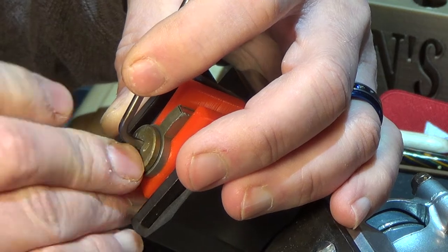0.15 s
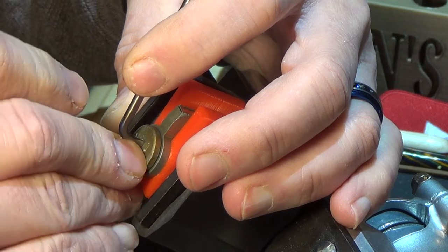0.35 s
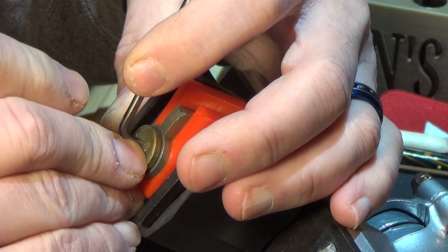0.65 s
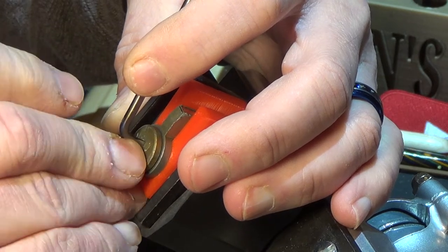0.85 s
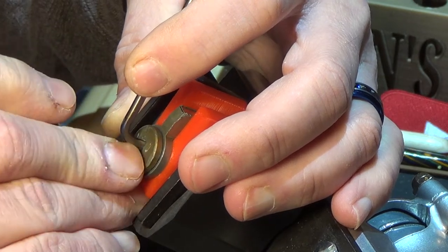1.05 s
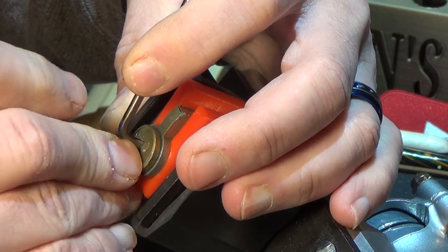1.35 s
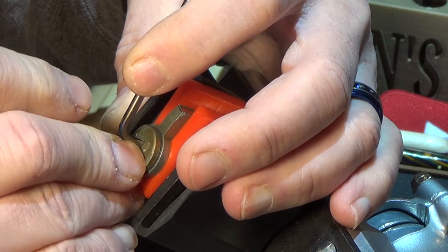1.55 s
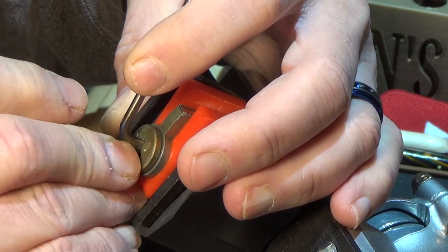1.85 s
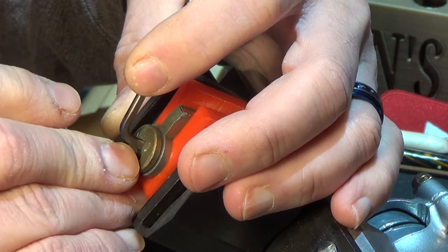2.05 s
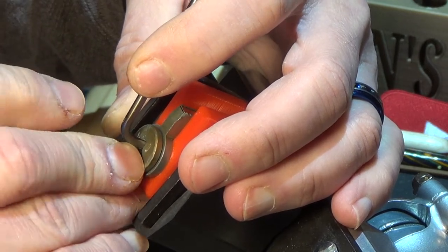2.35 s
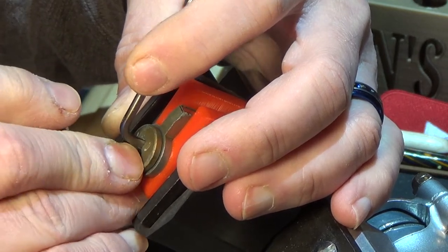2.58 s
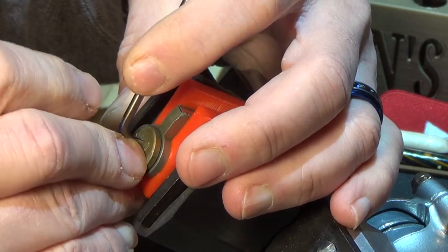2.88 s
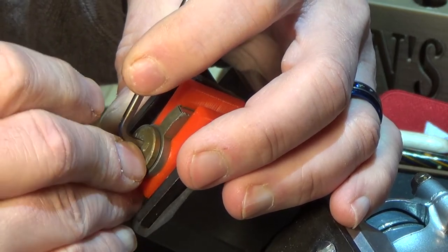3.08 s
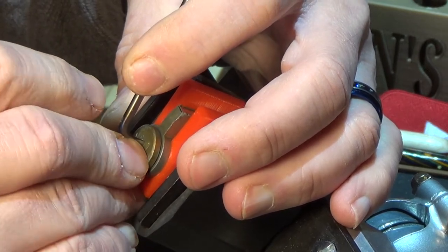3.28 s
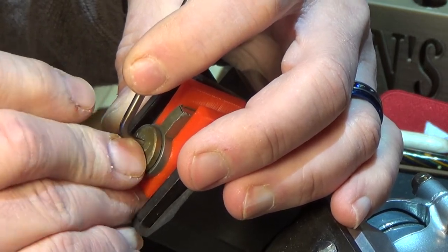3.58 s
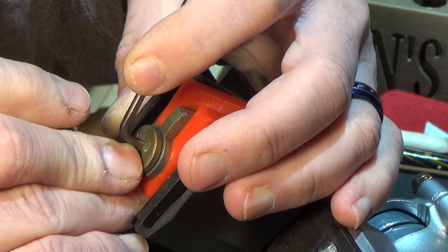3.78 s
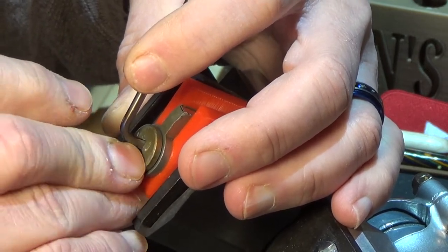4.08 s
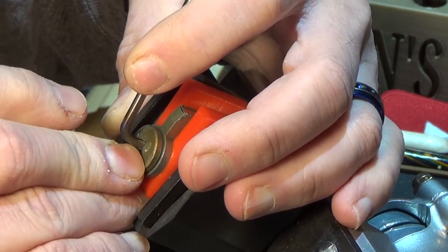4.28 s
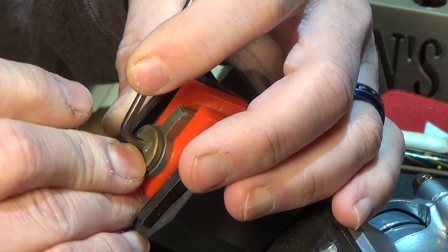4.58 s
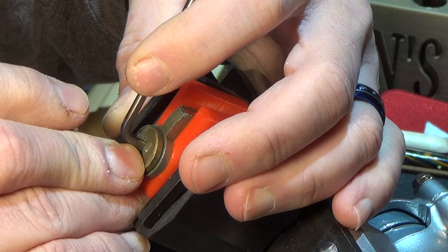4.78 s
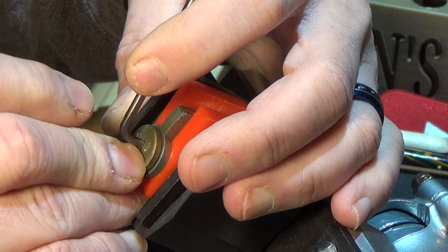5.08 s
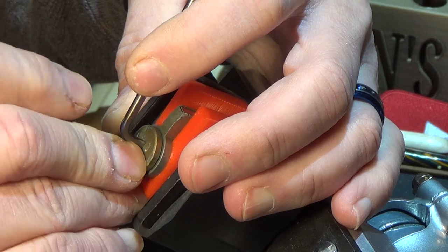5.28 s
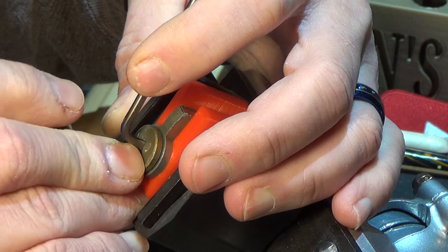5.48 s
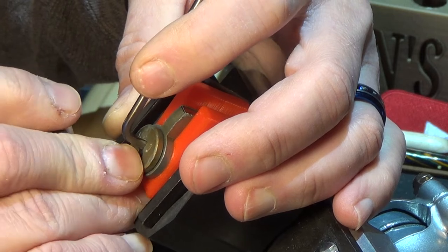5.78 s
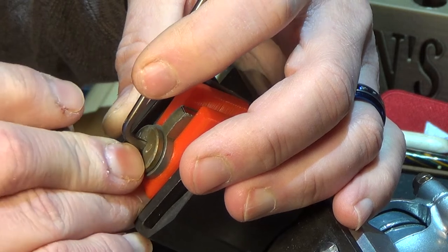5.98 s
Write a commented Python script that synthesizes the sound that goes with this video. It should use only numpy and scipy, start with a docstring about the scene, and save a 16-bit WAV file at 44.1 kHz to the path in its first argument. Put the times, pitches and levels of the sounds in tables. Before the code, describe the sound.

A steel pick clicks irregularly at lock pins close up, one click much louder, later a metallic twang, above soft fan rumble and hiss.

```python
"""Small workshop: a fan rumbles and hums, mostly to the right, over air hiss and a faint tube whine.
From 0.07 s a steel pick works the pins of a hand-held padlock: each contact ticks, clacks the pin chamber,
rings the lock body and knocks the plastic shell; loud ticks also ring the pin. Gritty scrapes join from 0.6 s.
The tool pings at 1.1 s, and slips and twangs at 4.5 s. Noise is spectrally shaped, rings are summed
decaying modes, and every pick sound gets bench echoes and a short room tail."""
import sys
import numpy as np
from scipy import signal
from scipy.fft import rfft, irfft, next_fast_len
from scipy.io import wavfile
from scipy.ndimage import map_coordinates

SR = 44100
rng = np.random.default_rng(int(sys.argv[2]) if len(sys.argv) > 2 else 0)


def wrap_up_sound(samples):
    """Save the sound to the file named by the first command line argument, as 16-bit audio."""
    columns = np.atleast_2d(samples).T
    # keep every value between -1 and 1, then stretch to whole-number steps
    tamed = np.clip(columns, -1, 1)
    steps = np.round(tamed * 32767).astype(np.int16)
    wavfile.write(sys.argv[1], SR, steps)


N = 270641
T = np.arange(SR // 4) / SR  # time since a blow, s


def amp(db):
    """Decibels to gain."""
    return 10 ** (np.asarray(db) / 20)


def unit(x):
    """Scale to rms 1."""
    return x / np.sqrt(np.mean(x ** 2) + 1e-20)


def packet(x):
    """Scale to energy 1."""
    return x / (np.linalg.norm(x) + 1e-12)


def along(points, hz):
    """Interpolate (f/Hz, value) points on a log frequency axis."""
    f, v = np.transpose(points)
    return np.interp(np.log(hz + 1), np.log(f + 1), v)


def fade(t, t60):
    """Exponential decay, 60 dB in t60."""
    return np.exp(-np.log(1000) * t / t60)


def wobble(rate_hz):
    """Smooth random curve, rate_hz knots a second."""
    knots = rng.standard_normal(int(N * rate_hz / SR) + 4)
    return map_coordinates(knots, [np.arange(N) * rate_hz / SR])


def filtered(x, response):
    """Multiply the spectrum of x by a response of frequency."""
    size = next_fast_len(N + SR // 2)
    hz = np.fft.rfftfreq(size, 1 / SR)
    return irfft(rfft(x, size) * response(hz), size)[..., :N]


# Stereo correlation of the background: f/Hz, left-right correlation
BACKGROUND_CORRELATION = [(30, .4), (70, .92), (150, .96), (400, .88), (1500, .94), (3200, .97), (5500, .5),
                          (14000, .55)]
# Stereo balance of the background: f/Hz, left minus right level/dB
BACKGROUND_BALANCE = [(60, -10), (120, -16), (240, -3.5), (480, -3), (950, 0.5), (1890, 0.0), (3770, 0),
                      (7520, 0), (15000, 0)]


def background(spectrum):
    """Stereo noise, rms 1: mid/side shares set the correlation; the bass leans right."""
    def mid_side_gain(hz):
        angle = np.arccos(np.clip(along(BACKGROUND_CORRELATION, hz), -1, 1)) / 2
        return amp(along(spectrum, hz)) * np.array([np.cos(angle), np.sin(angle)])

    def balance_gain(hz):
        return amp(along(BACKGROUND_BALANCE, hz) * np.array([[.5], [-.5]]))

    mid, side = filtered(rng.standard_normal((2, N)), mid_side_gain)
    return unit(filtered(np.array([mid + side, mid - side]), balance_gain))


def tones(lines, drift_rad, waver_db):
    """Steady sines that wander a little in phase and level."""
    t = np.arange(N) / SR
    total = np.zeros((2, N))
    for hz, db, pan_db in lines:
        level_db = db + pan_db * np.array([[.5], [-.5]]) + waver_db * wobble(4.85)
        phase = 2 * np.pi * hz * t + drift_rad * wobble(4.05)
        total += np.sqrt(2) * amp(level_db) * np.sin(phase)
    return total


# Fan noise colour: f/Hz, relative level/dB
FAN_RUMBLE = [(20, -28), (40, -20.5), (55, -23), (80, -9), (100, -5), (120, -7.5), (138, -1.5), (155, -5.5),
              (175, -3.5), (205, -9.5), (270, -11), (340, -19), (500, -40), (900, -82)]
# Fan hum lines: f/Hz, level/dB rms, left minus right level/dB
FAN_HUM = [(119, -65.5, -11), (140.4, -66.5, -8), (278.3, -76, -10), (309, -75.5, 3), (543, -75, 3),
           (1050, -83, -12)]


def fan():
    """Low noise plus wavering hum lines."""
    return amp(-53.5) * background(FAN_RUMBLE) + tones(FAN_HUM, drift_rad=0.62, waver_db=2.0)


# Hiss colour: f/Hz, relative level/dB
AIR_COLOUR = [(210, -12), (350, -2), (450, -1.5), (561, -2), (656, -7), (733, -5), (1140, -8.5), (1350, -7),
              (1560, -10.5), (2500, -12.5), (3260, -12), (9210, -17), (14100, -19), (15000, -41)]


def hiss():
    """Broadband noise with a slight level wander."""
    return amp(-60.0 + 0.13 * wobble(2.34)) * background(AIR_COLOUR)


# Picture tube lines, the two strongest beating: f/Hz, level/dB rms, left minus right level/dB
TUBE_LINES = [(15734.3, -60, 0), (15747.6, -66.5, 0), (15674.4, -75, 0), (15614.5, -80, 0), (15777, -80, 0)]
# Narrow fizz around and just below the whine: f/Hz, relative level/dB
TUBE_FIZZ = [(11000, -60), (13500, -30), (14400, -15), (15050, -9), (15350, 0), (15780, 1), (15900, -40),
             (17000, -80)]


def tube():
    """Close high lines over a narrow noise band."""
    return tones(TUBE_LINES, drift_rad=0.066, waver_db=-1.0) + amp(-72) * background(TUBE_FIZZ)


def coloured(push, colour, centre_hz=None, focus_db=0):
    """Push through a minimum-phase colour, favouring a narrow band at centre_hz; energy 1."""
    half = len(T)
    hz = np.fft.rfftfreq(2 * half, 1 / SR)
    db = along(colour, hz)
    if centre_hz:
        db = db + focus_db * np.exp(-(4 * np.log2((hz + 1) / centre_hz)) ** 2)
    # fold the cepstrum to make the response causal
    cepstrum = irfft(np.log(amp(db)))
    cepstrum[1:half] *= 2
    cepstrum[half + 1:] = 0
    response = np.exp(rfft(cepstrum))
    return packet(irfft(response * rfft(push, 2 * half))[:half])


def favoured(modes, centre_hz, focus_db, octaves):
    """The place touched decides which modes speak most: boost those near centre_hz."""
    return [(hz, db + focus_db * np.exp(-(np.log2(hz / centre_hz) / octaves) ** 2), t60)
            for hz, db, t60 in modes]


def ring(modes, attack_s, scatter_db):
    """Modes swell over the attack, then die; strengths vary per blow; energy 1."""
    hz, db, t60 = np.transpose(modes)[:, :, None]
    phase = 2 * np.pi * rng.random(hz.shape)
    strength = amp(db + scatter_db * rng.standard_normal(hz.shape))
    swell = np.sqrt(np.minimum(T / attack_s, 1))
    envelope = swell * fade(np.maximum(T - attack_s, 0), t60)
    return packet(np.sum(strength * envelope * np.sin(2 * np.pi * hz * T + phase), axis=0))


def chatter(length_s):
    """Metal catching on metal: a snap, then tiny impacts; short contacts are mostly snap."""
    envelope = (1 - np.exp(-T / 0.00004)) * np.exp(-(T / max(length_s, 1e-4)) ** 1.17)
    burst = packet(rng.standard_normal(len(T)) * envelope)
    snap = signal.unit_impulse(len(T), round(.00025 * SR))
    snap_share = np.exp(-length_s / .0011)
    push = np.sqrt(snap_share) * snap + np.sqrt(1 - snap_share) * burst
    # alternate between a flat spectrum and a short window
    for _ in range(3):
        even = irfft(np.exp(1j * np.angle(rfft(push))), len(T))
        push = even * np.exp(-(T / (2 * max(length_s, 3e-4))) ** 4)
    return push


# Noise colours of tick, clack and shell knock: f/Hz, relative level/dB
TICK_COLOUR = [(3000, -54), (5500, -1), (6800, 1), (9000, 0), (12700, -0.5), (14000, 2.5), (15500, -8),
               (17000, -22)]
CLACK_COLOUR = [(1000, -16.5), (2200, -8.5), (2900, -9), (3700, -5), (4800, -2.5), (5700, -16.5),
                (7500, -13), (14000, -20)]
KNOCK_COLOUR = [(120, -2), (300, 8), (450, 2.5), (700, 3.5), (1000, -8), (1400, 1.5), (2500, -10)]
# Modes of pin, pin chambers, lock body and plastic shell: f/Hz, relative level/dB, t60/s
PIN_MODES = [(4950, -17, .004), (6950, -22, .004), (7750, -11.5, .007), (8500, -7, .005),
             (10620, -13, .008), (11250, 0, .005), (11750, -16, .005), (13160, -8.5, .007),
             (14450, -19, .007), (15200, -14, .005)]
CHAMBER_MODES = [(2450, -4, .01), (2950, -1, .016), (3500, -6, .008), (4050, -6, .008), (4600, -1, .009),
                 (5030, 1.5, .01), (5650, -5, .006)]
LOCK_MODES = [(1209, -14, .05), (1522, -16, .04), (1597, -16, .04), (1760, -2, .014), (1827, 0, .052),
              (1925, -11, .03), (2068, -9, .04), (2200, -4, .014), (2282, -10, .045), (2350, -10, .04),
              (2570, -14, .035), (2791, -12, .045), (3360, -15, .05), (4090, -16, .06)]
SHELL_MODES = [(320, -7, .059), (451, 0, .073), (545, -3.5, .07), (677, -1.5, .045), (820, -1.5, .03),
               (1013, 0, .02), (1226, -7, .034), (1450, -3, .025)]


def contact(length_s, tick_hz, tick_db, clack_hz, clack_db, body_db, shell_hz, shell_db):
    """The pick touches a pin: tick, chamber clack, one faint early echo of both, lock and shell."""
    # loud ticks put more of their energy into the pin
    pin_share = np.clip(.06 + .8 * amp(tick_db - 3) ** 2, 0, .88)
    tick = coloured(chatter(2.3 * length_s), TICK_COLOUR, tick_hz, focus_db=10)
    tick = amp(tick_db) * np.sqrt(1 - pin_share) * tick
    pin = amp(tick_db) * np.sqrt(pin_share) * ring(PIN_MODES, attack_s=.9 * length_s, scatter_db=.7)

    chamber_share = .25
    crack = coloured(chatter(1.95 * length_s), CLACK_COLOUR, clack_hz, focus_db=6.5)
    chamber_modes = favoured(CHAMBER_MODES, clack_hz, focus_db=7, octaves=.3)
    chamber = ring(chamber_modes, attack_s=.4 * length_s, scatter_db=1)
    clack = amp(clack_db) * (np.sqrt(1 - chamber_share) * crack + np.sqrt(chamber_share) * chamber)

    # one faint early echo of tick and clack
    echo_s, echo_db = .0118, -22
    echo = amp(echo_db) * np.pad(tick + clack, (round(echo_s * SR), 0))[:len(T)]

    lock = amp(body_db) * ring(LOCK_MODES, attack_s=.0033, scatter_db=1)

    # the plastic takes a few ms to answer
    shell_modes = favoured(SHELL_MODES, shell_hz, focus_db=11, octaves=.55)
    hollow = ring(shell_modes, attack_s=.0048, scatter_db=1.5)
    thud = coloured(chatter(0.015), KNOCK_COLOUR, shell_hz, focus_db=6.5)
    shell = amp(shell_db) * (hollow + .7 * thud)
    return tick + pin + clack + echo + lock + shell


# Scrape colour: f/Hz, relative level/dB
GRIT_COLOUR = [(500, -22), (1800, -6), (3500, -5), (5200, -2), (7000, -2), (11000, 0), (13500, -3),
               (15500, -14), (17000, -30)]


def scrape(length_s, db):
    """Steel slides on brass: uneven gritty grains swell and fade."""
    stroke = np.sin(np.pi * np.minimum(T / length_s, 1))
    grains = rng.standard_normal(len(T)) * amp(6 * rng.standard_normal(len(T)))
    return amp(db) * coloured(stroke * grains, GRIT_COLOUR)


# Tool ping modes: f/Hz, relative level/dB, t60/s
PING_MODES = [(5335, 3, 0.059), (7348, -3, .04), (4027, -16, .04)]
# Rasp colour, shared by ping and twang: f/Hz, relative level/dB
RASP_COLOUR = [(1000, -25), (1900, -3), (2600, 0), (5700, 0), (7400, -1), (8200, -9), (12500, -12),
               (14500, -30)]


def ping(db):
    """The tool pings briefly over a short rasp."""
    tone = ring(PING_MODES, attack_s=.001, scatter_db=1)
    rasp = coloured(chatter(.006), RASP_COLOUR)
    return amp(db) * (tone + amp(-8) * rasp)


# Bending modes of the tool's blade: f/Hz, relative level/dB, t60/s
BLADE_MODES = [(1782, 2, .06), (2424, 1.5, .09), (2566, -8, .1), (2817, -3, .08), (3133, -7, .09),
               (3208, -9, .09), (3506, -4.5, .12), (3698, -2.5, .1), (3925, -8, .08), (4050, -5, .07),
               (4085, -3.5, .1), (4665, -3.5, .1), (4990, -5, .06), (5148, -6, .09), (5373, -1, .13),
               (5540, -6, .07), (5645, -8, .09), (6060, -3.5, .12), (6926, -4, .045), (7120, 1.5, .03),
               (7297, 5.5, .045), (7500, -9, .04)]


def twang(db, slip_s):
    """The blade rasps as it slips while its bending modes swell, then rings out."""
    blade = ring(BLADE_MODES, attack_s=.5 * slip_s, scatter_db=.5)
    rasp = coloured(rng.standard_normal(len(T)) * np.exp(-(T / slip_s) ** 4), RASP_COLOUR)
    return amp(db) * (blade + amp(-7) * rasp)


# Decay of the room tail: f/Hz, t60/s
ROOM_DECAY = [(200, 0.73), (1000, 0.11), (4000, 0.19), (11000, 0.16), (16000, 0.042)]


def in_room(x, wet_db, bench_db, bench_delay_s, bench_t60_s, width):
    """Direct sound, late echoes from bench and wall, and a fresh short stereo room tail."""
    hz, t, z = signal.stft(rng.standard_normal((2, len(T))), SR, nperseg=256)
    decay = fade(t, along(ROOM_DECAY, hz)[:, None])
    tails = signal.istft(z * decay, SR, nperseg=256)[1][:, :len(T)]
    mid, side = [packet(tail * np.minimum(T / 0.0052, 1)) for tail in tails]
    tail = np.array([mid + width * side, mid - width * side])
    bench = packet(rng.standard_normal(len(T)) * fade(T, bench_t60_s) * (T > bench_delay_s))
    answer = amp(bench_db) * bench + amp(wet_db) * tail
    return x + signal.fftconvolve(x[None], answer, axes=1)[:, :len(T)]


def add(track, start_s, sound):
    """Mix a sound into the track at start_s."""
    part = track[:, max(round(start_s * SR), 0):][:, :len(T)]
    part += sound[..., :part.shape[1]]


# Event levels are energies of the dry parts, relative to one another.
# Pick meets pin: t/s, nominal contact length/s, tick f/Hz, tick level/dB, clack f/Hz, clack level/dB,
# lock body level/dB, shell f/Hz, shell level/dB
CONTACT_EVENTS = [(0.0693, 0.0009, 8500, -29.5, 5000, -44, -37, 800, -45),
                  (0.149, .003, 9000, -50, 2900, -45, -32, 800, -34),
                  (0.3127, 0.0032, 9000, -42, 3500, -33, -47, 800, -53),
                  (0.4473, 0.0013, 11400, -21.5, 4850, -29.5, -36, 600, -37),
                  (0.636, .0008, 11700, -34, 4700, -50, -50, 800, -45),
                  (0.656, 0.0013, 11700, -31.5, 4700, -43, -42, 800, -42),
                  (0.663, .002, 10000, -38, 3220, -33.5, -45, 800, -39),
                  (0.8662, 0.0015, 7000, -9.5, 5100, -16.5, -32, 700, -29),
                  (0.8697, 0.00061, 9700, -12, 5000, -24, -25.5, 560, -38),
                  (0.876, .0025, 13000, -19, 4200, -31, -40, 600, -38),
                  (1.0965, .0014, 12000, -34, 4500, -43, -31, 700, -29),
                  (1.1048, 0.00054, 11500, -18.5, 4930, -18.5, -23.5, 600, -41),
                  (1.4169, 0.00032, 11200, -14.5, 2950, -20.5, -42, 800, -36),
                  (1.418, 0.0012, 12000, -20, 5100, -22, -37, 800, -37),
                  (1.4308, .0016, 10000, -27.5, 5000, -47, -48, 560, -44),
                  (1.6643, 0.0013, 10800, -22.5, 4700, -38.5, -39, 800, -37.5),
                  (2.4465, 0.0017, 11800, 3.5, 5070, -14.5, -11, 470, -17),
                  (2.6304, 0.0017, 10000, -50, 4600, -31, -24, 846, -28),
                  (2.645, .0024, 7000, -36, 2900, -35, -23.5, 820, -32),
                  (3.075, 0.0011, 11300, -11, 2800, -16.5, -26, 700, -37),
                  (3.0802, 0.00089, 7500, -20, 4500, -30, -39, 700, -36),
                  (3.1072, .0008, 11200, -23, 2900, -33.5, -49, 800, -44),
                  (3.2043, .0018, 10500, -29, 3600, -36, -38, 800, -42),
                  (3.2285, .0006, 9000, -32, 4000, -42, -49, 800, -50),
                  (3.2303, .0006, 11000, -32, 4700, -35, -49, 800, -55),
                  (3.2553, 0.001, 11700, -20.5, 3500, -28.5, -46, 800, -54),
                  (3.3333, 0.0014, 11000, -15.5, 4700, -23, -29, 890, -30.5),
                  (3.3505, 0.00083, 12300, -11, 3200, -15, -19, 1360, -25.5),
                  (3.3518, .001, 8640, -12.5, 4850, -33, -38, 800, -46),
                  (3.5095, 0.00074, 9100, -13.3, 4900, -26.5, -28.5, 850, -31.5),
                  (3.615, 0.0042, 6960, -36, 2880, -32, -27, 920, -34),
                  (3.815, .0026, 9000, -42, 2900, -48, -40, 1020, -32),
                  (5.188, 0.00052, 7400, -29.5, 5600, -44, -41, 800, -39),
                  (5.2835, .0015, 8800, -34, 5100, -37, -45, 800, -39),
                  (5.3425, .0016, 10200, -36, 2600, -47, -27, 1000, -34.5),
                  (5.3495, .0015, 9500, -41, 2200, -47, -33, 600, -36),
                  (5.462, .0008, 11800, -35, 4530, -33, -32, 1000, -27),
                  (5.4655, .003, 9000, -44, 2600, -40, -27.5, 700, -33),
                  (5.476, .0019, 12500, -36, 4800, -33, -47, 580, -29.5),
                  (5.7, .002, 9000, -45, 2900, -41, -41, 800, -39)]
# Pick drags along the keyway: t/s, length/s, level/dB
SCRAPE_EVENTS = [(.625, .054, -38), (1.655, 0.045, -30), (3.16, 0.11, -26.5), (3.192, 0.023, -25),
                 (3.61, 0.04, -35), (5.17, .064, -40)]
# Tool pings: t/s, level/dB
PING_EVENTS = [(1.14, -31)]
# Tool slips and springs back: t/s, level/dB, slip length/s
TWANG_EVENTS = [(4.5493, -14.5, 0.019)]


def picking():
    """Place every contact, scrape, ping and twang, each sounding in the room."""
    track = np.zeros((2, N))
    sources = [(CONTACT_EVENTS, contact), (SCRAPE_EVENTS, scrape),
               (PING_EVENTS, ping), (TWANG_EVENTS, twang)]
    for events, source in sources:
        for start_s, *settings in events:
            sound = in_room(source(*settings), wet_db=-18.5, bench_db=-18,
                            bench_delay_s=.006, bench_t60_s=.055, width=.6)
            add(track, start_s, sound)
    return track


def scene():
    """Fan, hiss and tube whine behind; the lock in front, slightly left."""
    lock_pan = amp([[.35], [-.35]])
    return fan() + hiss() + tube() + lock_pan * picking()


def record(dry):
    """Steep low-pass: almost nothing passes above the band limit."""
    top_hz = 16200
    return filtered(dry, lambda hz: 1 / np.sqrt(1 + (hz / top_hz) ** 160))


dry = scene()
out = record(dry)
wrap_up_sound(out)
```